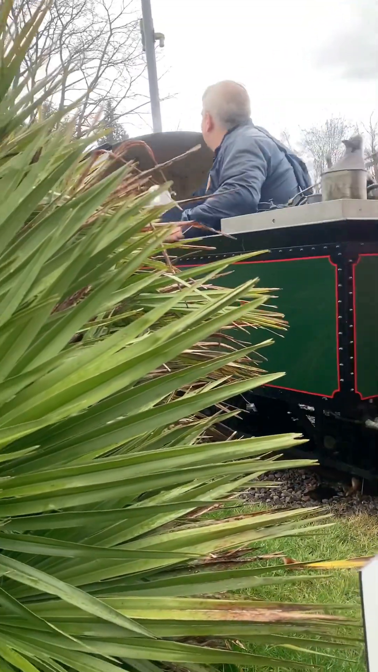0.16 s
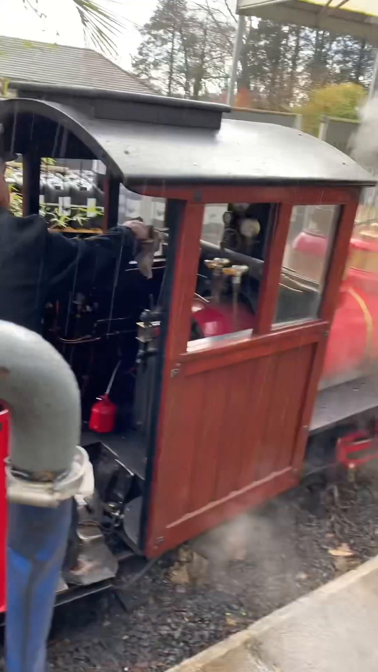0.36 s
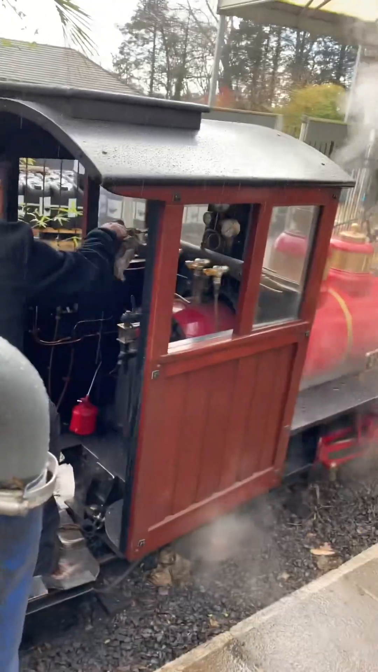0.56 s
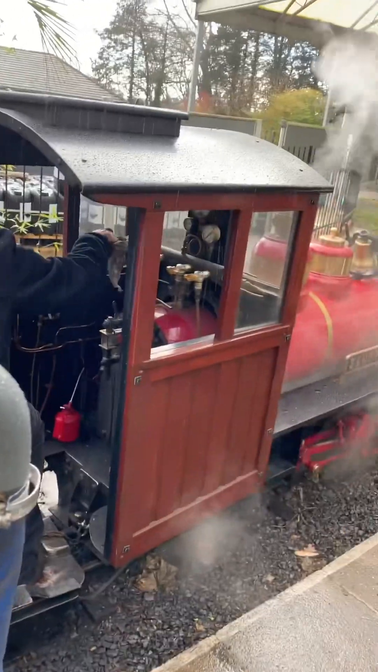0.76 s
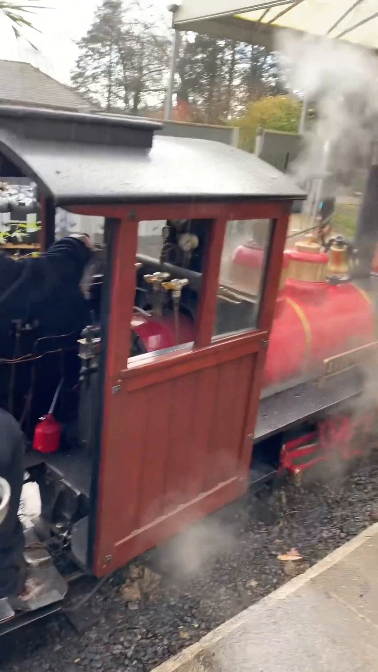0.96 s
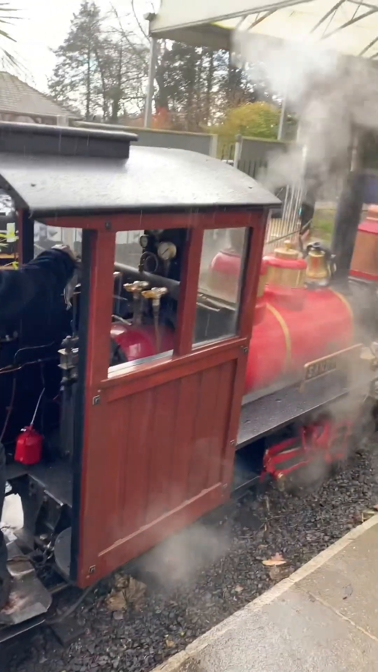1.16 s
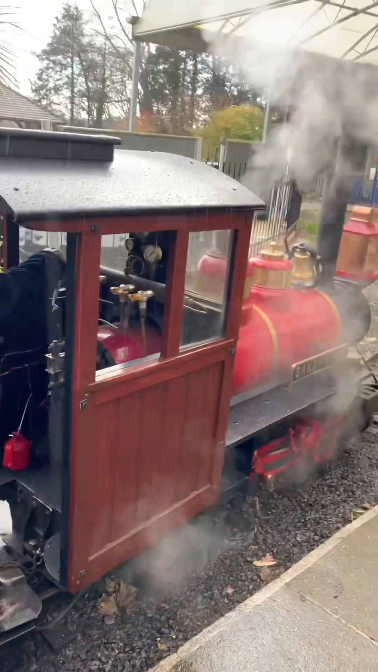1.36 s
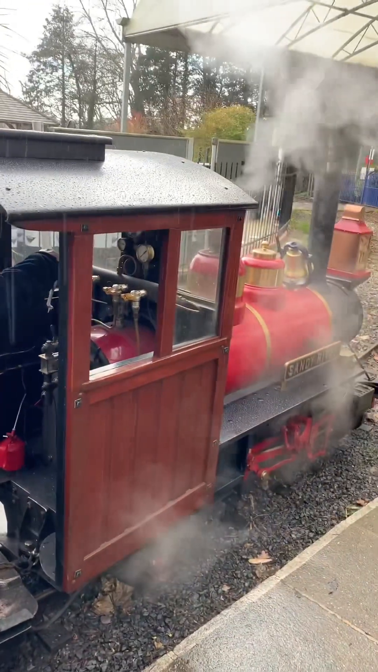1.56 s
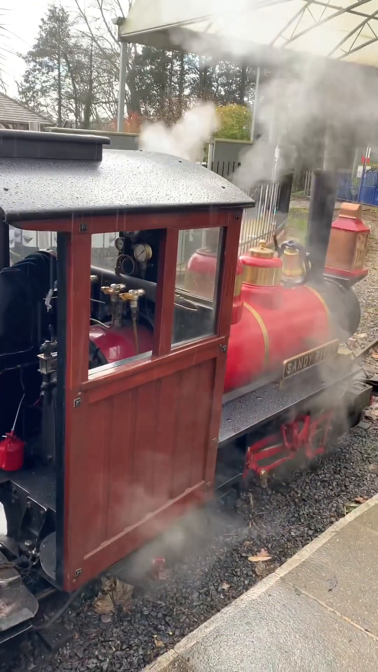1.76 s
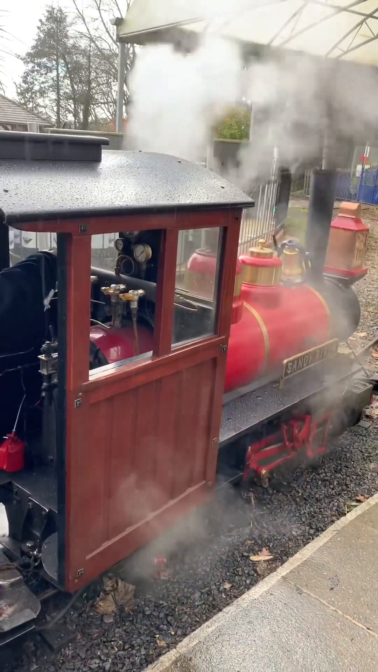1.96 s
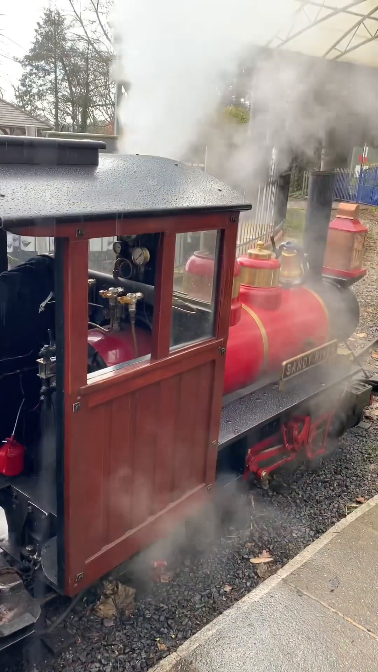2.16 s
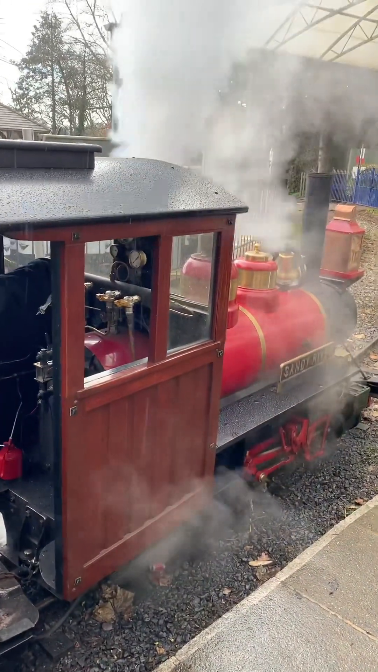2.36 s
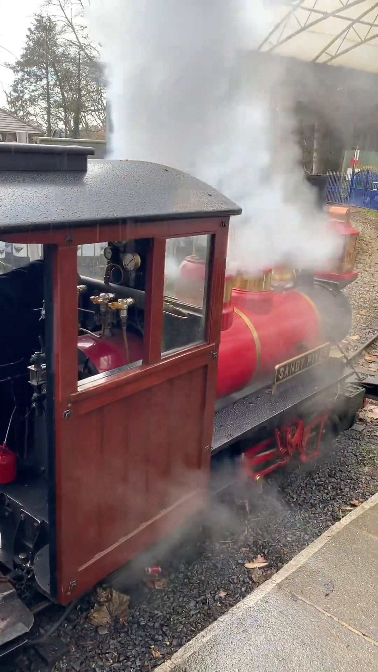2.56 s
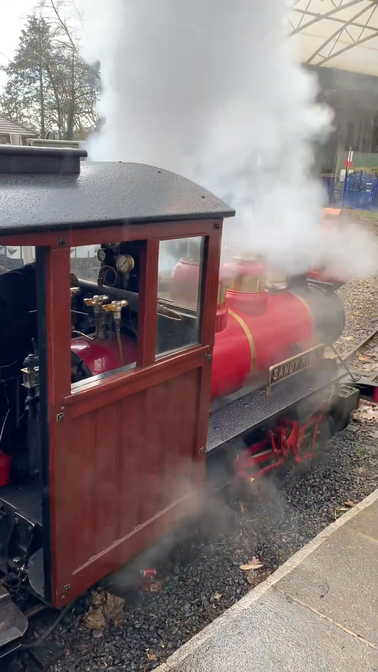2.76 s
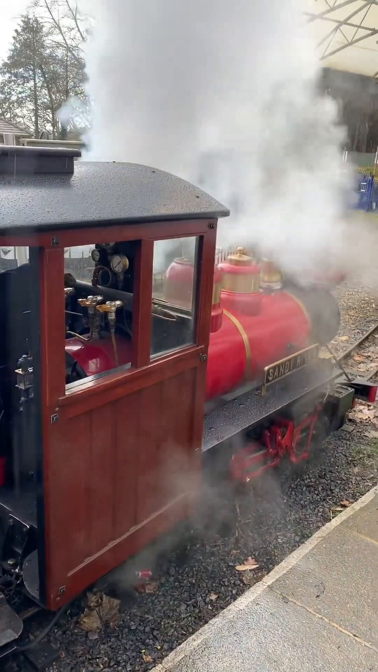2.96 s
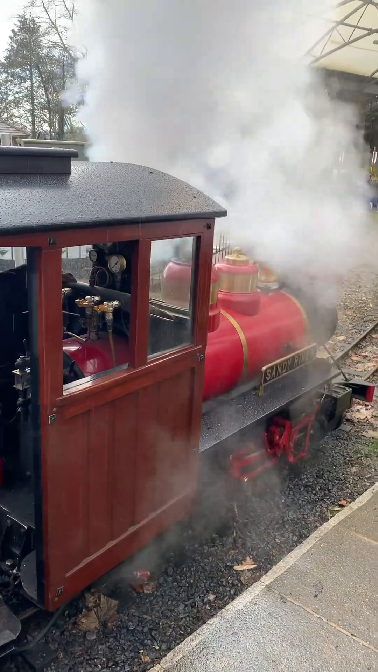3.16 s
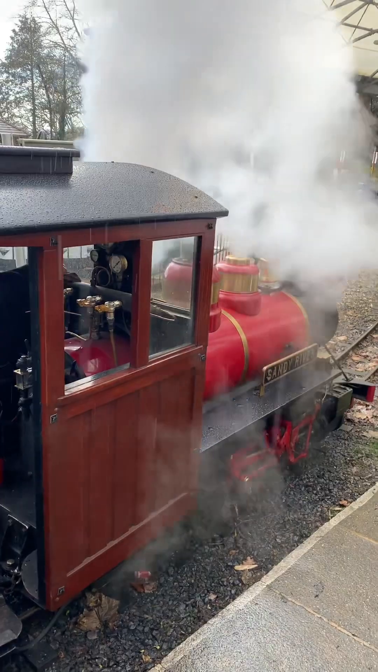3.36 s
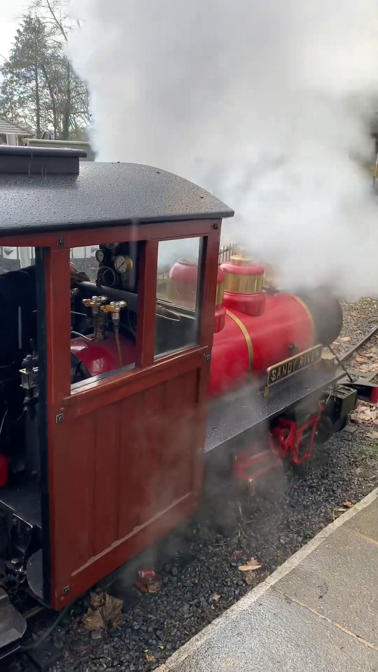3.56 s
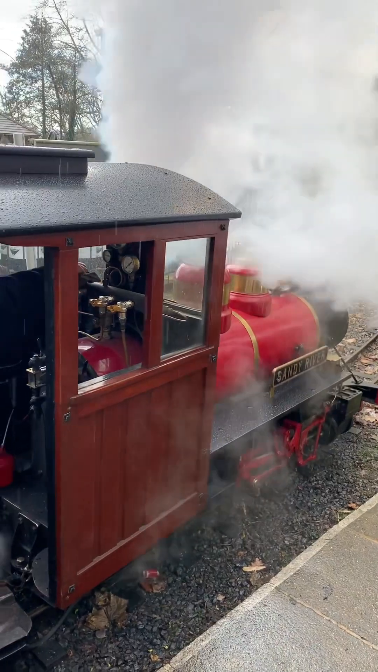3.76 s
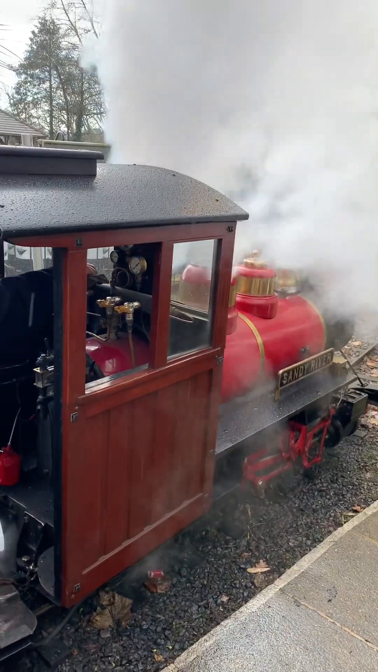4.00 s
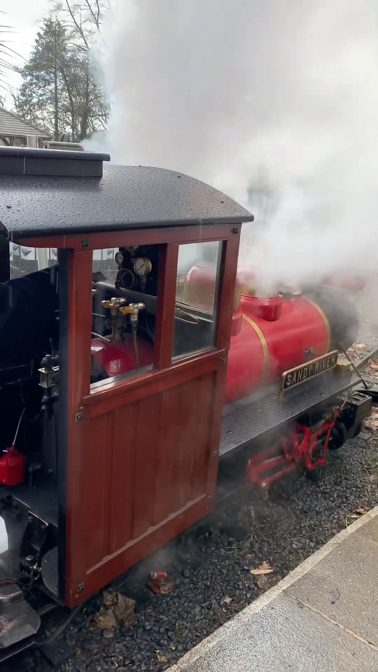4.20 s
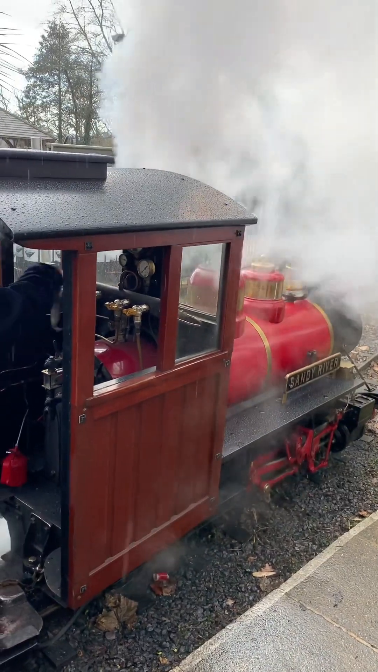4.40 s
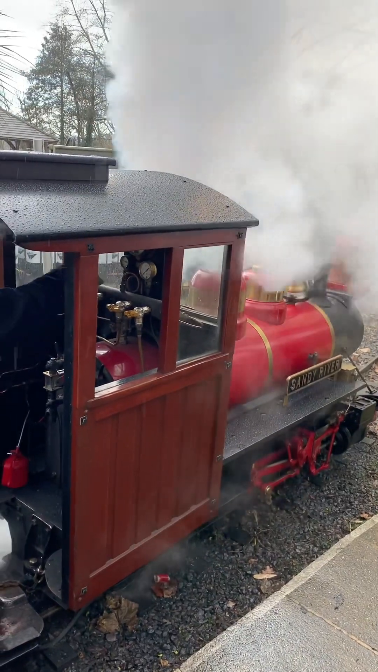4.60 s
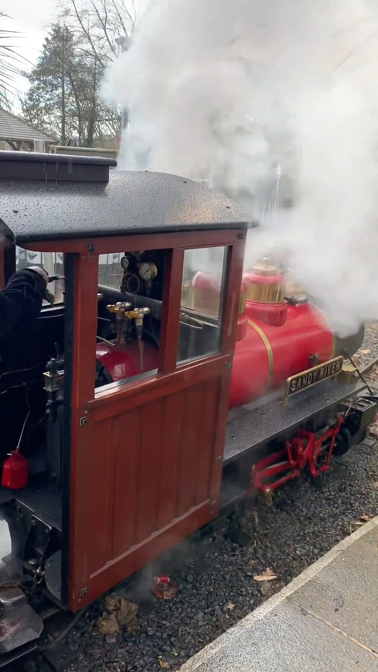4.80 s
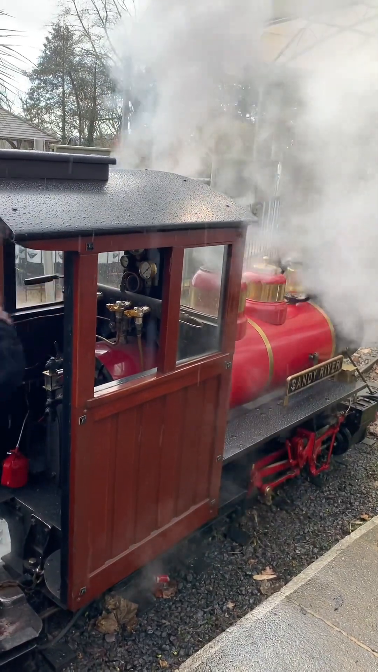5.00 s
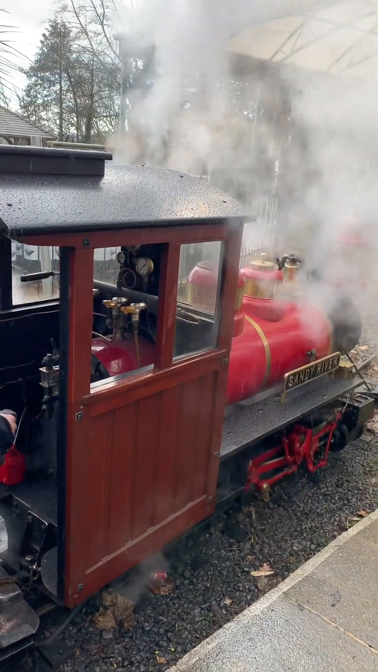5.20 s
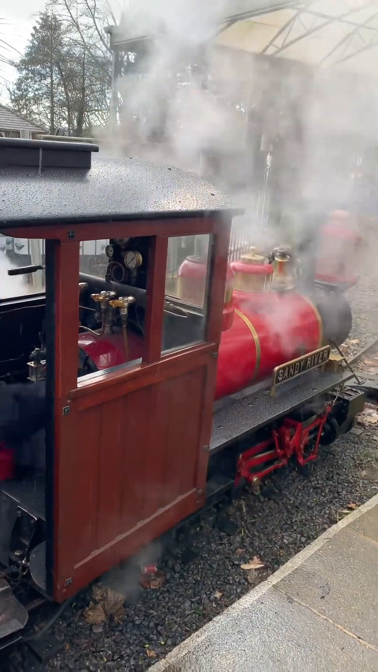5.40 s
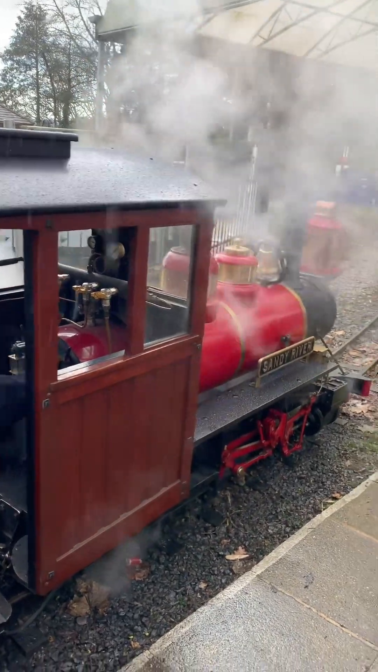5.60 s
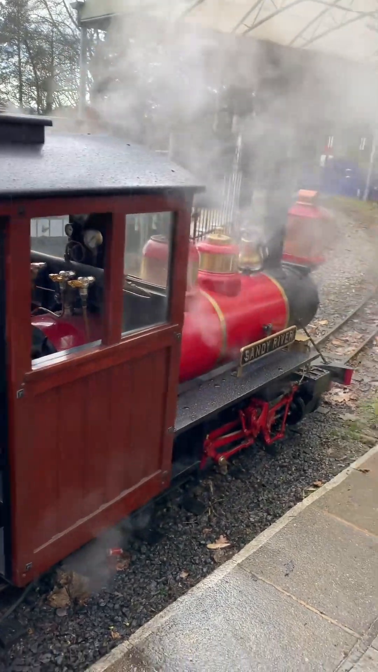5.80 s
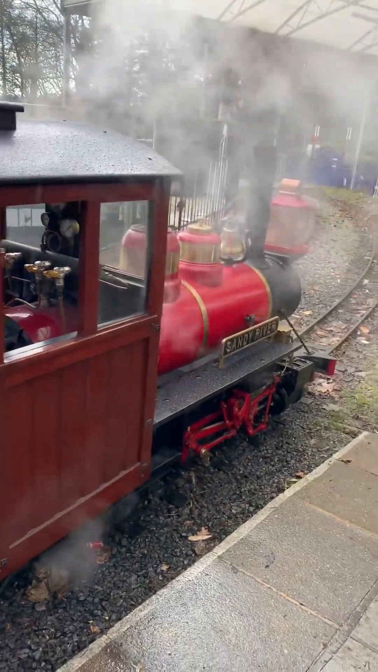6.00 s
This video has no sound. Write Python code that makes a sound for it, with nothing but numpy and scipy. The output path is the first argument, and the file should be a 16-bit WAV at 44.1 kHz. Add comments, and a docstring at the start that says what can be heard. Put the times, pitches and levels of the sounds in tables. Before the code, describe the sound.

From 0 to 0.35 s there is a lumpy low rumble with a little distant hiss, cut off abruptly. The sound switches to a standing steam locomotive close by: bright, sizzling leaking steam over soft fire and boiler rumble. At about 0.8 s the whistle valve opens on wet steam, with weak, breathy, fluttering tones and low rumble. From 1.9 s it gurgles louder, briefly catching, and at about 2.45 s locks into one steady tone around 350 Hz, rising slightly to 370, full of overtones, jet roar and treble fizz. It is loudest from 3 to 4.3 s, as the phone lowers its level in steps. It shuts at about 4.4 s; a short blast follows from 4.5 to 4.7 s. Wall echoes fade over roughly half a second, leaving very faint hiss and rumble. A faint tap ends it at 6 s.

```python
"""At a station platform a small steam locomotive stands hissing, after a moment of rumble from another spot.
Its whistle splutters on wet steam, locks into one long tone, then gives a short blast; walls echo it.
The whistle is a sum of harmonic partials, unlocked pipe modes, an edge tone and jet noise.
The engine is shaped noise: a leak through ringing valves, with fire and boiler rumble; a faint tap ends it.
A phone listens; its level steps down several times while the whistle swells, leaving the hiss very faint."""
import sys
import numpy as np
from scipy import signal
from scipy.fft import rfft, irfft, next_fast_len
from scipy.io import wavfile
from scipy.ndimage import uniform_filter1d, map_coordinates

SR = 44100
rng = np.random.default_rng(int(sys.argv[2]) if len(sys.argv) > 2 else 0)


def transcribe(signal):
    """Save signal, clipped to [-1, 1], as a 16-bit WAV file at the path in sys.argv[1]."""
    frames = np.atleast_2d(signal).T
    limited = np.clip(frames, -1, 1)
    pcm = np.round(limited * 32767).astype(np.int16)
    wavfile.write(sys.argv[1], SR, pcm)


def volts(x):
    """Linear amplitude factor 10**(x/20) for a level x in dB, scalar or array-like."""
    e = np.asarray(x, float) / 20
    return 10 ** e


N = 266805

# Whistle valve: [fully open t/s, closing starts t/s, time until the tone is SHUT_DB down/s]
BLASTS = [(.78, 4.284, 0.1753), (4.515, 4.655, 0.0564)]
# Whistle pitch, before a slight random wobble: [t/s, f/Hz]
WHISTLE_PITCH = [(.8, 325.4), (1.4, 314), (1.9, 334), (2.15, 348), (2.45, 354.3), (2.55, 350.4),
                 (2.85, 352.6), (3.15, 359.3), (3.45, 366), (3.8, 367.8), (4.15, 372), (4.3, 367.5),
                 (4.36, 361.5), (4.48, 369.3), (4.63, 369.7), (4.72, 353)]
# Lowest partial, valve open: [t/s, rms level/dB]
LOWEST_LEVEL = [(.78, -52), (.85, -44), (1.25, -52.5), (1.45, -32.5), (1.6, -35), (1.78, -43),
                (1.95, -26.5), (2.1, -19.5), (2.2, -22.5), (2.355, -26.5), (2.425, -10.5), (2.477, -5),
                (2.6, 1.5), (2.8, 2.5), (3.07, 6), (3.1, 6), (3.29, 8), (3.656, 4.5), (4.217, 4.5),
                (4.7, 4)]
# The tone locks briefly and slips again: [t/s, half length/s, rms level/dB]
BRIEF_LOCKS = [(2.258, 0.027, -9), (2.396, .008, -12.5)]
# The lowest partial wanders between the sides: [t/s, left minus right level/dB]
LOWEST_DRIFT = [(2.2, -2.1), (2.5, -3), (3.45, -2.5), (3.6, 2), (3.8, 2.5), (4, 1.7), (4.7, 0.5)]
# Share of the tone that flutters: [t/s, share 0-1]
FLUTTER_SHARE = [(.78, 0.63), (1.55, 0.54), (1.9, 1), (2.17, 1), (2.22, 0.25), (2.4, .2), (2.5, 0.11),
                 (4.72, 0.05)]
# Reference level of the overtones, valve open: [t/s, rms level/dB]
OVERTONE_LEVEL = [(2.2, -90), (2.33, -55), (2.42, -34), (2.46, -24.5), (2.6, -14), (2.72, -10.5),
                  (3.07, -7), (3.3, -4.5), (3.45, -2), (4.2, -3.5), (4.7, -5)]
# Partials 2-5: [partial, left minus right level/dB, level against the reference/dB,
# extra dB lost per dB of the tone as the valve shuts]
MIDDLE_PARTIALS = [(2, -3.5, -8, 0.2), (3, 1, 0.5, 1.8), (4, -2.5, -9.5, 1.5), (5, -3.5, -9.5, 1.8)]
# Partials from the sixth up: [partial, level against the fifth/dB]
UPPER_PARTIALS = [(6, -12.5), (7, -10), (8, -18), (9, -12), (10, -14.5), (11, -14.5), (12, -13), (13, -12)]
# A partial fades or swells for a while: [t/s, half length/s, partial, level change/dB]
PARTIAL_SWELLS = [(2.5, .06, 2, -2.5), (2.65, 0.2, 4, -13), (2.53, .07, 5, -8.5), (3.03, .07, 3, -9.5),
                  (2.98, .12, 5, 4.5), (3.45, 0.16, 4, -10), (3.33, .05, 5, -4), (3.4, 0.28, 2, 1.5),
                  (4.25, .1, 5, -1)]
# Unlocked low, middle and high pipe modes: [level at a gentle roar/dB, dB per dB of roar, flutters/s]
PIPE_MODES = [(-42.5, 0.39, 120), (-44.5, 1.1757, 65), (-45.5, 1, 200)]
# Pitches of these modes: [t/s, low f/Hz, middle f/Hz, high f/Hz]
MODE_PITCHES = [(.75, 802, 980, 1472), (1.399, 793, 980, 1466), (1.75, 739, 1080, 1537),
                (2, 759.2, 1111, 1695), (2.18, 819, 1126, 1810), (2.3, 838, 988, 1904),
                (2.6, 840, 993, 1892)]
# Swells and dips of single modes: [t/s, half length/s, mode, level change/dB]
MODE_SWELLS = [(.83, 0.029, 1, 5.5), (1.02, 0.12, 1, -8.5), (1.35, 0.38, 1, 6), (2.03, 0.062, 2, 8),
               (2.26, .08, 2, -13), (2.27, .06, 3, -6.5), (2.39, .04, 2, 4), (2.4, .06, 3, -4),
               (1.5, .2, 3, 6.5)]
# Low throb: [f/Hz, relative level per Hz/dB]
THROB_SPECTRUM = [(25, -29.5), (45, -6), (100, 0), (160, -6), (300, -40)]
# Edge tone at the lip, silent outside these times: [t/s, f/Hz, level/dB]
EDGE_TONE = [(2.6, 8520, -39.5), (2.85, 9000, -28.5), (3, 9350, -22), (3.3, 9950, -14.5),
             (3.7, 10150, -14.5), (4.1, 9775, -15.5), (4.3, 9850, -16), (4.52, 9850, -27), (4.7, 9800, -20)]
# Course of the steam jet: [t/s, relative level/dB]
JET_COURSE = [(.75, -57.5), (1.17, -56.5), (1.32, -46), (1.63, -49.5), (2, -33), (2.15, -24.5),
              (2.236, -23), (2.29, -28.5), (2.414, -26.5), (2.476, -30), (2.53, -28), (2.85, -23),
              (3.07, -20.5), (3.3, -19.5), (3.65, -19.5), (4.2, -21), (4.7, -24)]
# Course of the fizz against the jet: [t/s, relative level/dB]
FIZZ_COURSE = [(1.7, -30), (1.82, -8), (2.05, -11.5), (2.16, -6), (2.28, -8.5), (2.37, -4.5), (2.6, 0),
               (3.05, 1.5), (3.6, 3.5), (4.7, 4)]
# Jet noise, roar and fizz: [f/Hz, relative level per Hz/dB]
ROAR_SPECTRUM = [(30, -63), (100, -38.5), (250, 1.5), (560, -6), (1000, 5), (1900, 3.5), (3500, 0),
                 (5000, -3.5), (9000, -12)]
FIZZ_SPECTRUM = [(500, -43.5), (2000, -17), (4500, -0.5), (7000, 0), (10000, 2), (13000, -1.5),
                 (16000, -4.5)]
# Wall echoes, before the walls' absorption: [delay t/s, level/dB]
WALL_ECHOES = [(.06, -30), (.1, -24), (.17, -23), (0.221, -36), (0.271, -37.5), (.4, -46.5), (.5, -57.5),
               (.6, -61), (.72, -61)]
# Reflection at the walls: [f/Hz, level sent back/dB]
WALL_REFLECTION = [(370, -1), (740, -8), (1100, -4.5), (1480, -1), (1850, -4), (2600, -7), (10000, -22)]
# Leaking steam: [f/Hz, relative level per Hz/dB]
HISS_SPECTRUM = [(30, -30), (150, -2), (500, -7), (1200, -6.5), (2300, -14.5), (2850, -20.5), (4500, -11),
                 (6000, -7), (8000, -0.5), (13000, -1), (16000, -6)]
# Resonances of the leaking valves: [f/Hz, width/Hz, strength/dB]
VALVE_RINGS = [(3450, 210, 5), (4000, 250, -10), (5200, 150, -4.5), (5880, 150, 1.5), (6844, 200, 2.5),
               (8300, 120, -2), (8880, 200, -1), (10500, 300, -3), (12020, 160, 0), (12750, 200, 2),
               (14200, 200, 3), (15200, 230, 4)]
# Hiss and low rumble grow fainter under the whistle: [t/s, level change/dB]
ENGINE_SINK = [(2.05, 0.5), (2.47, -8.5), (2.7, -9.5), (4.3, -17), (6.05, -16.5)]
# Upper rumble, before random wobble: [t/s, level/dB]
UPPER_RUMBLE_LEVEL = [(.36, -67), (.5, -72), (.74, -65), (.79, -45.5), (1.54, -43), (2.02, -32),
                      (2.47, -43.5), (4.7, -45.5), (4.81, -57), (6.05, -58.5)]
# Low and upper rumble: [f/Hz, relative level per Hz/dB]
LOW_RUMBLE_SPECTRUM = [(15, -54), (30, -23.5), (45, -4.5), (60, -0.5), (90, -4.5), (130, -23.5),
                       (300, -59.5)]
UPPER_RUMBLE_SPECTRUM = [(30, -56.5), (80, -21), (120, -5.5), (260, 0), (450, -3.5), (900, -26.5),
                         (2000, -62)]
# Far ambience: [f/Hz, relative level per Hz/dB]
FAR_SPECTRUM = [(100, -22.5), (400, -7.5), (900, -1.5), (2500, -10), (4200, -10.5), (6800, -19.5),
                (9000, -14.5), (16000, -17.5)]
# Rumble of the first spot: [f/Hz, relative level per Hz/dB]
FIRST_SPECTRUM = [(15, -45), (30, -28.5), (60, 2.5), (120, 0), (260, -3.5), (400, -18), (900, -21.5),
                  (2000, -43)]
# Stereo coherence of all noise: [f/Hz, left-right likeness 0-1]
LIKENESS = [(100, 1), (250, 0.98), (500, 0.59), (1000, 0.53), (2600, .75), (4000, 0.62), (8000, 0.97)]
# The level drops at once: [t/s, level lost/dB]
LEVEL_STEPS = [(2.4774, 5.5), (2.5283, 3), (2.5965, 3), (2.7298, 3), (3.0726, 3), (3.2947, 2.5)]
# Phase between the two sides: [f/Hz, lead of the left side/rad]
SIDE_LEAD = [(0, 0), (900, -.35), (1600, 0), (2600, 1.3), (4200, 2.45), (4680, np.pi), (15280, 6 * np.pi),
             (22000, 9 * np.pi)]

FIRST_SPOT_ENDS_S = .352
SHUT_DB, TONE_RISE_DB_S = 42.5, 382.5


def whistle():
    """Superposition: the valve gates the pipe's oscillations, to which the turbulent jet adds noise."""
    phase = turns(curves(WHISTLE_PITCH)[0] * (1 + .0006 * wobble(30)))
    pipe = partials(phase) + splutter() + throb() + edge_tone(phase)
    return valve(TONE_RISE_DB_S) * pipe + steam_jet()


def partials(phase):
    """Harmonic series: a locked air column sounds at whole multiples of its lowest frequency."""
    share, = curves(FLUTTER_SHARE)
    blow = valve(TONE_RISE_DB_S)
    locks = sum(volts(db) * bump(s, half) for s, half, db in BRIEF_LOCKS)
    lowest = volts(curves(LOWEST_LEVEL)[0]) + locks
    out = sides(curves(LOWEST_DRIFT)[0]) * lowest * flutter(phase, share, rate=65)
    reference_db, = curves(OVERTONE_LEVEL)
    for k, pan_db, db, faster in MIDDLE_PARTIALS:
        # the caller applies the common valve gain, so only the extra fall belongs here
        extra_fall = valve(TONE_RISE_DB_S, faster=faster) / (blow + 1e-9)
        level_db = reference_db + db + 20 * np.log10(extra_fall + 1e-9) + changes(PARTIAL_SWELLS, round(k))
        shaken = share * k ** .55  # higher partials shake more
        out += sides(pan_db) * volts(level_db) * flutter(round(k) * phase, shaken, rate=60)
    fifth_db = level_db  # the last of the middle partials
    for k, db in UPPER_PARTIALS:
        out += volts(fifth_db + db) * flutter(round(k) * phase, 0.26, rate=30)
    return out


def splutter():
    """Unlocked modes: on wet steam the pipe's resonances flutter independently, following the roar."""
    t = np.arange(N) / SR
    wet_from_s, dry_from_s, dry_out_db_s = .78, 2.43, 150
    gentle_roar_db = -44  # on the scale of the jet's course
    wet = (t > wet_from_s) * volts(-dry_out_db_s * np.clip(t - dry_from_s, 0, None))
    roar_db, = curves(JET_COURSE)
    out = 0
    for k, (hz, (db, follow, rate)) in enumerate(zip(curves(MODE_PITCHES), PIPE_MODES)):
        level_db = db + follow * (roar_db - gentle_roar_db) + changes(MODE_SWELLS, k + 1)
        out = out + wet * volts(level_db) * flutter(turns(hz), 1, rate)
    return out


def throb():
    """Low-frequency noise: the full blast shakes up a throb that follows the overtones."""
    return volts(curves(OVERTONE_LEVEL)[0] - 44) * rush(colour(THROB_SPECTRUM), patchy_db=2.0)


def edge_tone(phase):
    """Edge tone with amplitude modulation: the pipe swings the jet at the lip once a cycle."""
    edge_hz, edge_db = curves(EDGE_TONE, outside=-120)
    beat = unit(1 + 1.3 * np.cos(phase) + .9 * np.cos(2 * phase))
    edge_phase = turns(edge_hz * (1 + 0.0022 * wobble(3.9)))
    return volts(edge_db) * beat * flutter(edge_phase, .9, rate=130)


def steam_jet():
    """Turbulent jet noise: a broad roar and a treble fizz, each gated by the valve at its own rate."""
    jet_db, = curves(JET_COURSE)
    roar_db = jet_db + 7 + .6 * wobble(30)
    fizz_db = jet_db + curves(FIZZ_COURSE)[0] + 7.5 + .8 * wobble(12)
    roar = valve(rise_db_s=299.5, fall_db_s=149.5) * volts(roar_db) * rush(colour(ROAR_SPECTRUM), patchy_db=1.1)
    fizz = valve(rise_db_s=401, fall_db_s=184.5) * volts(fizz_db) * rush(colour(FIZZ_SPECTRUM), patchy_db=1.5)
    return sides(-2.3) * roar + fizz


def valve(rise_db_s, fall_db_s=None, faster=0):
    """Throttled flow: the tone dies ever faster as the valve shuts, the steam at an even rate in dB."""
    t, gain = np.arange(N) / SR, 0
    for full, closing, length in BLASTS:
        late = np.clip(t - closing, 0, None)
        if fall_db_s is None:
            fall_db = (1 + faster) * SHUT_DB * (late / length) ** 2
        else:
            fall_db = fall_db_s * late
        gain = gain + volts(-rise_db_s * np.clip(full - t, 0, None) - fall_db)
    return gain


def walls(x):
    """Reflection: each wall returns a copy with a short scattered trail; the canopy adds a thin, even tail."""
    t = np.arange(SR // 25) / SR
    long = np.arange(SR) / SR
    tail = rng.standard_normal((2, SR)) * volts(-60 * long / 1.3) * (long > .03)
    high_pass = lambda hz: (hz / 1200) ** 2 / (1 + (hz / 1200) ** 2)
    tail = filtered(np.pad(tail, ((0, 0), (0, N - SR))), high_pass)[:, :SR]
    answer = volts(-24) * tail / np.linalg.norm(tail[0])
    for delay, db in WALL_ECHOES:
        smear = 0.059 * rng.standard_normal((2, len(t))) * volts(-60 * t / 0.09)
        smear[:, 0] = 1  # the direct reflection
        answer[:, round(delay * SR):][:, :len(t)] += volts(db) * smear
    return filtered(signal.fftconvolve(x, answer, axes=1)[:, :N], colour(WALL_REFLECTION))


def standing_engine():
    """Resonance: leak noise rings the valves; fire and boiler rumble over the station's ambience."""
    since = np.arange(N) / SR - FIRST_SPOT_ENDS_S
    sink_db, = curves(ENGINE_SINK)
    fade_in_db = -7.5 * np.clip(1 - since / 0.034, 0, 1)
    hiss_db = -28 + sink_db + fade_in_db + 0.37 * wobble(2.5)
    hiss = volts(hiss_db) * rush(lambda hz: colour(HISS_SPECTRUM)(hz) * valve_rings(hz), patchy_db=1.5)
    low_db = -43.5 + .9 * sink_db + .8 * wobble(9)
    low = volts(low_db) * rush(colour(LOW_RUMBLE_SPECTRUM), patchy_db=2.0)
    upper_db = curves(UPPER_RUMBLE_LEVEL)[0] + 1.5 * wobble(9)
    upper = volts(upper_db) * rush(colour(UPPER_RUMBLE_SPECTRUM), patchy_db=0.5)
    air = volts(-53) * rush(colour(FAR_SPECTRUM), patchy_db=2.5)
    return (since > 0) * (hiss + air + low + upper)


def valve_rings(hz):
    """Resonance curves: each valve mode adds a Lorentzian peak of power to a flat response."""
    peaks = sum(4 * volts(2 * db) / (1 + (2 * (hz - centre) / width) ** 2) for centre, width, db in VALVE_RINGS)
    return np.sqrt(1 + peaks)


def tick():
    """Damped oscillation: a faint tap near the phone, heard as a brief downward chirp ending in a short thud."""
    t = np.clip(np.arange(N) / SR - 5.9935, 0, None)
    slide_hz = 50 + 1.31 / (t + .0003) * np.exp(-t / 0.013)
    attack = 1 - np.exp(-t / 0.00071)
    return volts(-22.0 - 60 * t / 0.047) * attack * np.sin(turns(slide_hz * (t > 0)))


def first_spot():
    """Band-shaped noise: a lumpy low rumble and a little far hiss, ending abruptly."""
    gate = np.arange(N) / SR < FIRST_SPOT_ENDS_S
    rumble = volts(-31.5 + 0.71 * wobble(60)) * rush(colour(FIRST_SPECTRUM), patchy_db=2.0)
    far_hiss = volts(-38.5) * rush(colour(FAR_SPECTRUM), patchy_db=3.0)
    return gate * (rumble + far_hiss)


def rush(gain, patchy_db):
    """Partly coherent stereo noise of rms 1, its level varying at random over time and frequency."""
    z = signal.stft(rng.standard_normal((2, N)), nperseg=512)[2]
    field = uniform_filter1d(rng.standard_normal(z.shape[1:]), size=6, axis=0)
    field = uniform_filter1d(field, size=12, axis=1)
    pair = signal.istft(z * volts(patchy_db * unit(field)), nperseg=512)[1][:, :N]
    # coherence is the cosine of twice the angle between mid and side
    angle = lambda hz: np.arccos(np.clip(along(LIKENESS, hz), -1, 1)) / 2
    mid, side = filtered(pair, lambda hz: gain(hz) * np.array([np.cos(angle(hz)), np.sin(angle(hz))]))
    return unit(np.array([mid + side, mid - side]))


def flutter(phase, share, rate):
    """Narrow-band oscillation of rms 1: part steady sine, part shaken at random in size and phase."""
    share = np.clip(share, 0, 1)
    steady = np.sqrt(2 * (1 - share ** 2))
    return (steady + share * wobble(rate)) * np.sin(phase) + share * wobble(rate) * np.cos(phase)


def turns(hz):
    """Phase as the time integral of frequency."""
    return 2 * np.pi * np.cumsum(hz) / SR


def wobble(rate):
    """Band-limited random fluctuation of rms 1, rate knots a second."""
    knots = rng.standard_normal(int(N * rate / SR) + 4)
    return unit(map_coordinates(knots, [np.arange(N) * rate / SR]))


def bump(s, half):
    """Gaussian envelope of height 1."""
    return np.exp(-((np.arange(N) / SR - s) / half) ** 2)


def changes(rows, which):
    """Gains in dB add: the summed swells of one partial or mode."""
    return sum(db * bump(s, half) for s, half, k, db in rows if round(k) == which)


def sides(pan_db):
    """Intensity stereo: the left-right level difference is split evenly between two gains."""
    return volts(np.array([pan_db / 2, -pan_db / 2]).reshape(2, -1))


def filtered(x, response):
    """Linear filtering: the spectrum of x times a complex response of frequency."""
    m = next_fast_len(N + SR // 4)
    return irfft(rfft(x, m) * response(np.fft.rfftfreq(m, 1 / SR)), m)[..., :N]


def colour(points):
    """Amplitude response of a [f/Hz, level/dB] spectrum."""
    return lambda hz: volts(along(points, hz))


def along(points, hz):
    """Interpolation over logarithmic frequency."""
    f, v = np.transpose(points)
    return np.interp(np.log(hz + 1), np.log(f + 1), v)


def curves(rows, outside=None):
    """Linear interpolation in time: one value per sample for each column after t/s."""
    s, *cols = np.transpose(rows)
    return [np.interp(np.arange(N) / SR, s, c, outside, outside) for c in cols]


def unit(x):
    """Normalisation to rms 1."""
    return x / np.sqrt(np.mean(x ** 2) + 1e-20)


def scene():
    """Superposition of all sources at the phone."""
    blast = whistle()
    return blast + walls(blast) + standing_engine() + first_spot() + tick()


def low_pass(x):
    """Removes everything above the highest recorded frequency."""
    return signal.sosfilt(signal.butter(12, 16860, fs=SR, output="sos"), x)


def record(dry):
    """The level steps down and a phase lead parts the two sides; in the treble, weak mid or side drops out;
    peaks round."""
    t, step_s, top_hz = np.arange(N) / SR, 0.0027, 15850
    lost_db = sum(db * np.clip((t - s) / step_s + .5, 0, 1) for s, db in LEVEL_STEPS)
    stepped = dry * volts(-lost_db)
    half_lead = lambda hz: np.interp(hz, *np.transpose(SIDE_LEAD)) / 2
    parted = lambda hz: np.exp(1j * half_lead(hz) * np.array([[1], [-1]])) * (hz < top_hz)
    left, right = filtered(stepped, parted)
    # in the treble, a band nearly in phase or nearly opposed becomes purely so
    share = lambda hz: np.abs([np.cos(half_lead(hz)), np.sin(half_lead(hz))])
    keep = lambda hz: np.where(hz > 3500, np.clip((share(hz) - .3) / 0.0258, 0, 1), 1)
    mid, side = filtered(np.array([left + right, left - right]) / 2, keep)
    pair = np.array([mid + side, mid - side])
    rounded = pair / (1 + np.abs(pair / .97) ** 8) ** (1 / 8)  # soft limit of the highest peaks
    return low_pass(rounded)


dry = scene()
out = record(dry)
transcribe(out)
```